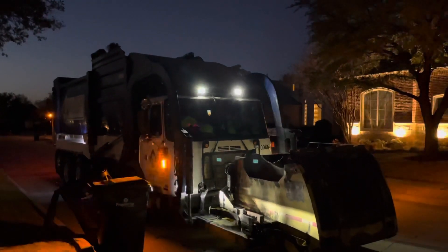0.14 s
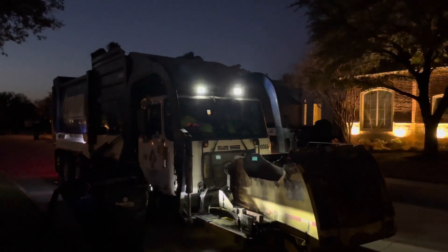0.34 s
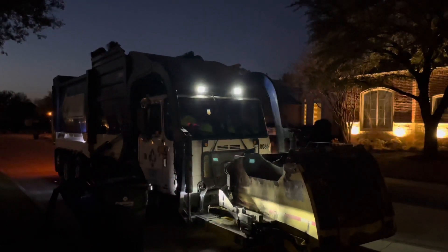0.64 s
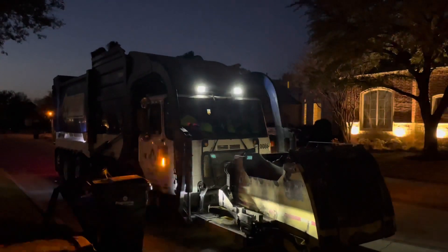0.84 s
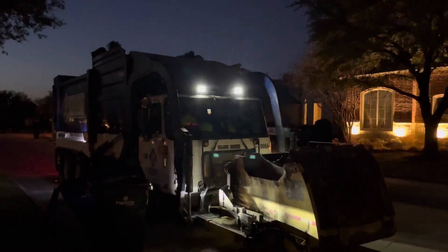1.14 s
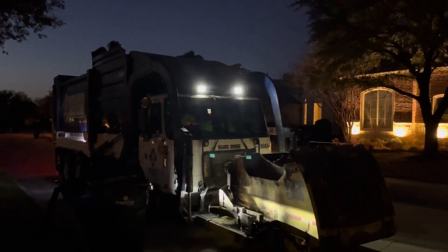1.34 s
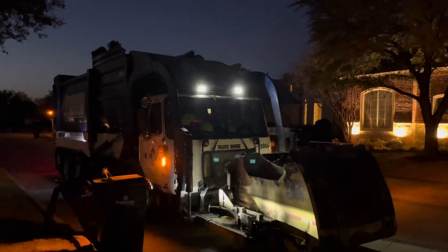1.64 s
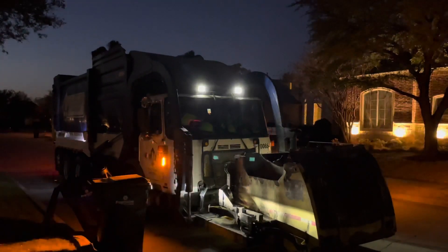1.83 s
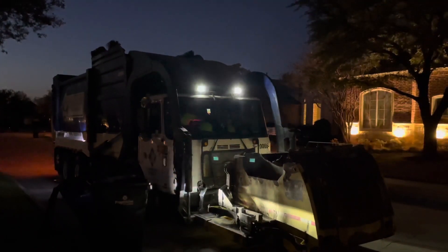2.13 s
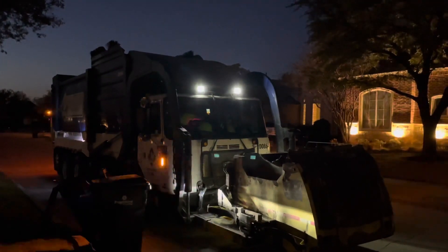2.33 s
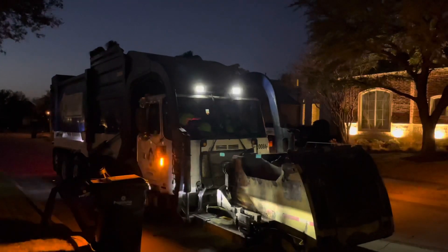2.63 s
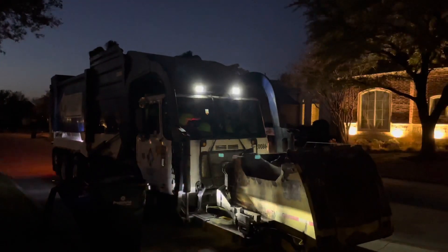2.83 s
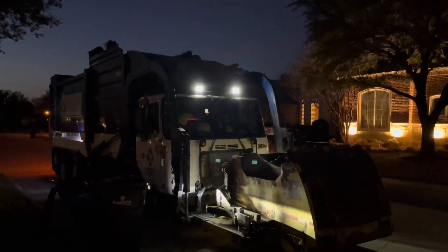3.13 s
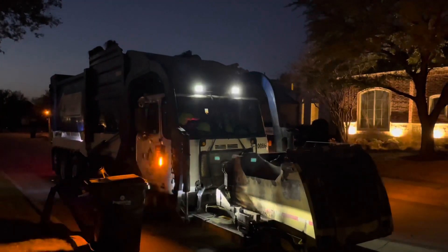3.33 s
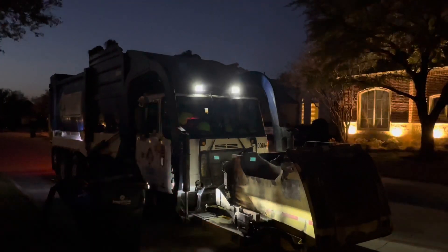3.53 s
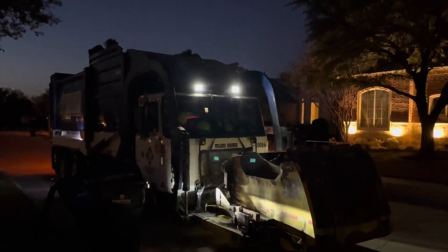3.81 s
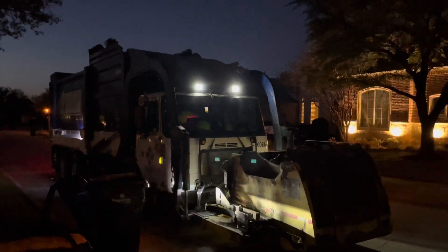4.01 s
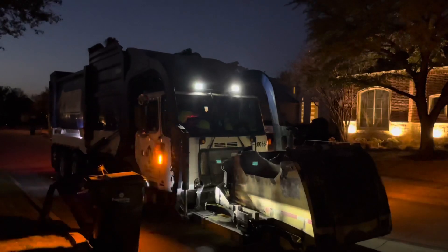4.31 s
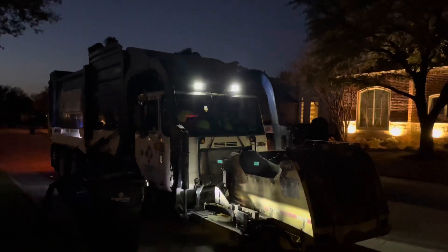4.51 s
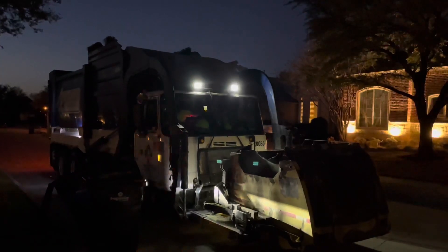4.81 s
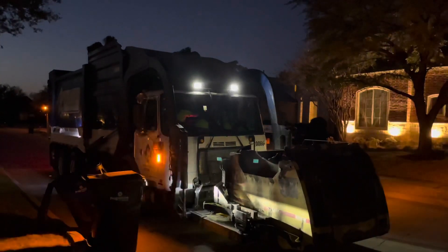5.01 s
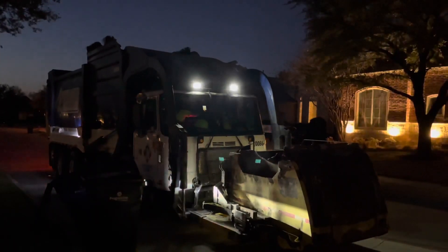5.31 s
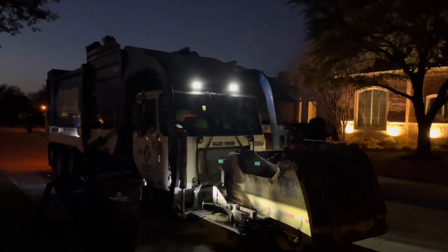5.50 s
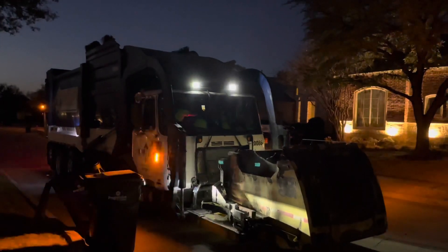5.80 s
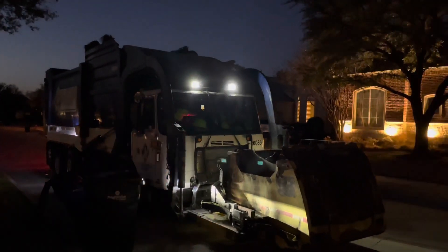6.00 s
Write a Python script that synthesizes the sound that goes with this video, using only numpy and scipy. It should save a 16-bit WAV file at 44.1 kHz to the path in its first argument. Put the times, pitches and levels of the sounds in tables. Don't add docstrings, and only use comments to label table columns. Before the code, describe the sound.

A heavy diesel garbage truck idles a few metres away outdoors, exhaust throbbing, valves clattering, pump and gears whining over a faint air leak. After about a second an air valve hisses; the pump whine stumbles and the cooling fan quickly spins up. The engine sags, recovers, and a deep hum and broad air roar continue. Close stereo phone pickup.

```python
import sys
import numpy as np
from scipy import signal
from scipy.fft import rfft, irfft
from scipy.io import wavfile
from scipy.ndimage import uniform_filter1d

SR = 44100
rng = np.random.default_rng(int(sys.argv[2]) if len(sys.argv) > 2 else 0)


def to_wav(s):
    ch = np.atleast_2d(s).T
    pcm = np.round(np.clip(ch, -1, 1) * 32767)
    wavfile.write(sys.argv[1], SR, pcm.astype(np.int16))


def rack_gain(trim_db):
    fader = np.asarray(trim_db, float)
    return 10 ** (fader / 20)


N = 271215
TIME = np.arange(N) / SR
BIN_HZ = np.fft.rfftfreq(N, 1 / SR)


def curves(table):
    seconds, *columns = np.transpose(table)
    return [np.interp(TIME, seconds, column) for column in columns]


def on_log_hz(table, column=1):
    rows = np.array(table, float)
    return np.interp(np.log(BIN_HZ + 1), np.log(rows[:, 0] + 1), rows[:, column])


def ramp(start_s, takes_s):
    return np.clip((TIME - start_s) / takes_s, 0, 1)


def bump(at_s, width_s):
    return np.exp(-((TIME - at_s) / width_s) ** 2)


def walk(rate):
    hold = int(SR / rate)
    levels = np.repeat(rng.standard_normal(N // hold + 1), hold)
    smooth = uniform_filter1d(uniform_filter1d(levels, hold), hold)
    return 0.85 * smooth[:N]


def noise(colour, db, swell_db, flicker_db):
    spectrum = rfft(rng.standard_normal((2, N))) * rack_gain(on_log_hz(colour))
    total = 0
    swell = walk(2.63)
    for octave in range(5, 15):
        octaves_away = np.clip(np.log2(BIN_HZ + 1) - octave, -1, 1)
        share = np.cos(np.pi / 2 * octaves_away) ** 2
        strength_db = swell_db * swell + flicker_db * walk(11)
        total = total + irfft(spectrum * share, N) * rack_gain(strength_db)
    return total * rack_gain(db) / np.sqrt(np.mean(total ** 2))


def tone(turns, db, waver_db, slip, start=None):
    start = rng.random() if start is None else start
    strength = np.sqrt(2) * rack_gain(db + waver_db * walk(8.2))
    return strength * np.sin(2 * np.pi * (turns + start + slip * walk(14)))


def panel_db(firing_hz, peak_hz, peak_db, fall_db):
    floor_db = -18
    return np.maximum(peak_db - fall_db * (firing_hz - peak_hz) ** 2, floor_db)


def engine(firings, firing_db):
    # multiple of the camshaft rate, level in dB.
    exhaust_orders = [(5, -48), (8, -55), (9, -45), (10, -41), (11, -62), (12, -43), (13, -45.5),
                      (14, -65.5), (15, -46.5), (18, -44), (20, -51), (21, -57)]
    # frequency in Hz, level in dB per Hz.
    clatter_colour = [(25, -17.5), (70, -4.5), (150, -9.5), (300, -6), (430, -10.5), (750, -3), (950, -2),
                      (1150, -7), (1450, -5), (2200, -19), (3200, -14.5), (5500, -29.5), (6000, -23),
                      (7400, -41.5)]
    cam = firings / 6
    exhaust = tone(firings, firing_db, 0.75, 0.0062, start=0)
    light_load_db = -30
    limp_db = -35.5 - np.maximum(firing_db - light_load_db, 0)
    exhaust += tone(7 * cam, limp_db, 0.6, 0.01, start=0.82)
    exhaust += sum(tone(k * cam, db, 0.52, 0.023) for k, db in exhaust_orders)
    beat = 1 + 0.062 * np.cos(2 * np.pi * firings) + 0.049 * np.cos(2 * np.pi * cam)
    return exhaust, beat * noise(clatter_colour, db=-28, swell_db=0.92, flicker_db=0.87)


def fan(firing_hz):
    # frequency in Hz, level in dB per Hz.
    roar_colour = [(25, -38), (55, -12), (100, -5), (200, 0.5), (320, -6.5), (480, -8.5), (750, -6),
                   (1080, -11.5), (1360, -12.5), (1800, -22), (2400, -32.5), (3100, -23), (5500, -40.5),
                   (14000, -54.5)]
    freewheel = 0.1
    take_up = np.sin(np.pi / 2 * ramp(start_s=1.685, takes_s=0.225))
    grip = freewheel + (1 - freewheel) * take_up
    blades_per_firing = 3.057
    blades = np.cumsum(blades_per_firing * firing_hz * grip) / SR
    hum_db = -16.5 + panel_db(firing_hz, peak_hz=66.98, peak_db=0, fall_db=1.2)
    hum = tone(blades, hum_db, 0.8, 0.014)
    hum += tone(2 * blades, -42, 3.0, 0.12)
    roar = noise(roar_colour, db=-17, swell_db=0.27, flicker_db=1.5)
    surge_db = 1.5 * bump(at_s=1.87, width_s=0.031)
    return hum * grip ** 5.4, roar * grip ** 3.3 * rack_gain(surge_db)


def hydraulics(firings, firing_hz):
    # multiple of the piston rate, level in dB.
    pump_tones = [(1, -31.5), (2, -51.5), (6, -38), (7, -34)]
    # multiple of the tooth meshing rate, level in dB.
    gear_tones = [(3, -49.5), (4, -51.5), (5, -47), (6, -42.5), (8, -40), (20, -57)]
    pistons, teeth = 3.761 * firings, 1.746 * firings
    stumble_db = -10 * bump(at_s=1.635, width_s=0.036)
    low_db = stumble_db - 11.5 * ramp(start_s=1.77, takes_s=0.25)
    sixth_db = panel_db(firing_hz, peak_hz=67.0, peak_db=3.3, fall_db=2.6)
    seventh_db = panel_db(firing_hz, peak_hz=68.3, peak_db=2.8, fall_db=5.4)
    gear_db = panel_db(firing_hz, peak_hz=66.9, peak_db=1.4, fall_db=4.2)
    gain_db = {6: sixth_db + low_db / 2, 7: seventh_db}
    pump = sum(tone(k * pistons, db + gain_db.get(k, low_db), 1.1, 0.027) for k, db in pump_tones)
    gears = sum(tone(k * teeth, db + gear_db, 0.68, 0.037) for k, db in gear_tones)
    return pump + gears


def air():
    # frequency in Hz, level in dB per Hz.
    hiss_colour = [(2000, -48), (3500, -7), (5500, -11), (6000, 3), (7400, -5), (8300, -5.5), (9200, -5),
                   (10500, -8.5), (12000, -11.5), (13200, -20), (14500, -47), (15500, -26)]
    leak = noise(hiss_colour, db=0, swell_db=0.35, flicker_db=1.3)
    opens_s = 0.916
    valve_db = -43 - ramp(opens_s, takes_s=0.8)
    valve = ramp(opens_s, takes_s=0.03) * rack_gain(valve_db)
    steady_db = -46.5
    return leak * np.hypot(rack_gain(steady_db), valve)


def ports(tones, noises):
    # frequency in Hz, lead of the left port in radians.
    port_lead = [(0, 0), (330, .4), (520, 1.4), (640, 0), (900, .9), (1380, 6.0), (2070, 12.1),
                 (2500, 12.1), (3400, 15.3), (4200, 14.1), (5250, 17.6), (8400, 15.7), (10200, 15.4),
                 (12500, 12.6)]
    # frequency in Hz, left minus right in dB.
    port_shade = [(60, 0), (200, 1), (390, -1), (560, 8), (800, 2), (1200, 9), (1500, 7), (1900, 0),
                  (2300, -6), (2700, 3), (3500, 7), (4600, 2), (6000, 11), (8800, 1)]
    # frequency in Hz, likeness from 0 to 1.
    port_alike = [(100, .995), (400, .93), (540, .65), (750, .94), (950, .83), (1200, .26), (1380, .72),
                  (1550, .14), (2080, .62), (2330, .15), (3200, .76), (4300, .2), (7000, .15), (9300, .68)]
    # frequency in Hz, left minus right in dB, lead of the left port in radians.
    tone_ports = [(65, 0, 0), (200, 1, .18), (250, 1.1, .33), (940, 2.4, .8), (1520, 1.1, 1.6),
                  (1780, 5.5, 2.8)]
    alike = on_log_hz(port_alike)
    lag = np.exp(-1j * np.interp(BIN_HZ, *np.transpose(port_lead)))
    steady = rfft(tones)
    near, scattered = rfft(noises)
    right_noise = lag * alike * near + np.sqrt(1 - alike ** 2) * scattered
    right_noise = right_noise * rack_gain(-on_log_hz(port_shade))
    tone_lag = np.exp(-1j * on_log_hz(tone_ports, column=2))
    right_tones = steady * rack_gain(-on_log_hz(tone_ports)) * tone_lag
    return irfft(np.array([steady + near, right_noise + right_tones]), N)


def scene():
    # time in seconds, firing rate in Hz.
    engine_speed = [(0, 67.9), (.85, 67.05), (1.2, 67.8), (1.5, 69.1), (1.62, 69.4), (1.95, 65.75),
                    (2.1, 65.22), (2.25, 65.7), (2.55, 67.2), (2.75, 68.0), (3.0, 68.15), (3.5, 67.9),
                    (4.25, 66.8), (4.9, 66.55), (5.4, 66.9), (6.15, 66.4)]
    # time in seconds, level in dB.
    engine_load = [(0, -28.5), (.75, -31.5), (1.05, -29), (1.5, -22.5), (1.8, -29), (1.95, -26.5),
                   (2.1, -42), (2.4, -27), (2.75, -23.5), (3.0, -23), (4.5, -27), (5.5, -23.5), (6.15, -25)]
    firing_hz = uniform_filter1d(curves(engine_speed)[0], size=SR // 10)
    firings = np.cumsum(firing_hz) / SR
    exhaust, clatter = engine(firings, curves(engine_load)[0])
    hum, roar = fan(firing_hz)
    tones = exhaust + hydraulics(firings, firing_hz) + hum
    return ports(tones, clatter + roar + air())


def band_limit(x):
    return signal.sosfilt(signal.butter(12, 15620, fs=SR, output="sos"), x)


def record(dry):
    # frequency in Hz, width in Hz, gain in dB.
    resonances = [(392, 22, 2), (755, 15, 1.5), (924, 37, 3), (1080, 360, -1.5), (1340, 46, 3.5),
                  (1637, 46, -5), (3610, 220, 4), (5650, 70, -12), (7460, 260, -6.5), (9140, 330, -5.5)]
    colour_db = sum(db * np.exp(-((BIN_HZ - hz) / width) ** 2) for hz, width, db in resonances)
    coloured = irfft(rfft(dry) * rack_gain(colour_db), N)
    heard = np.tanh(0.31 * coloured) / 0.29
    return band_limit(heard)


dry = scene()
out = record(dry)
to_wav(out)
```